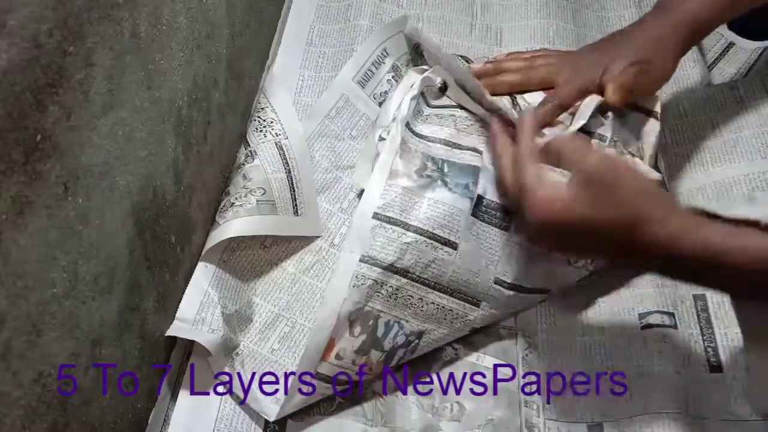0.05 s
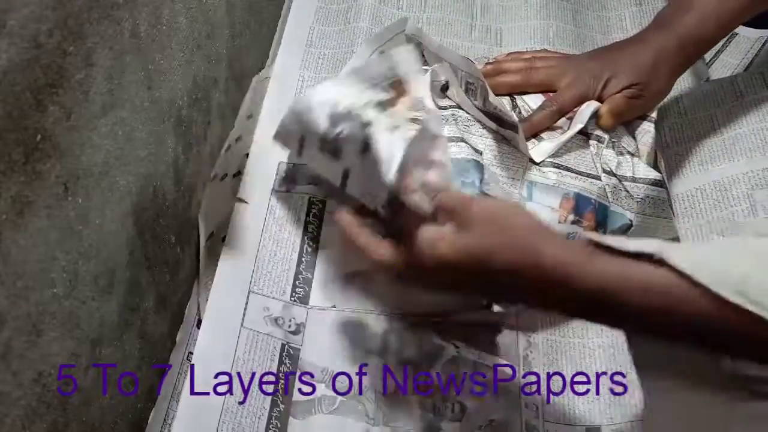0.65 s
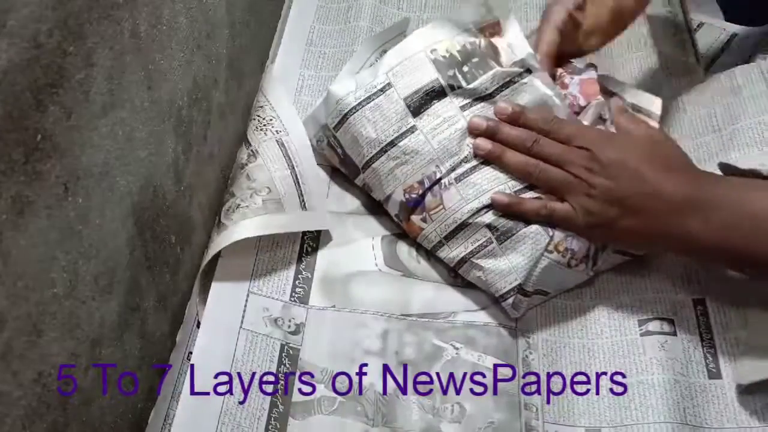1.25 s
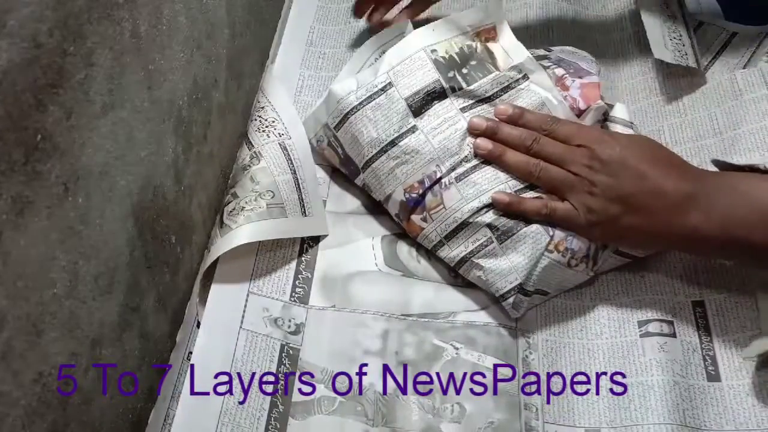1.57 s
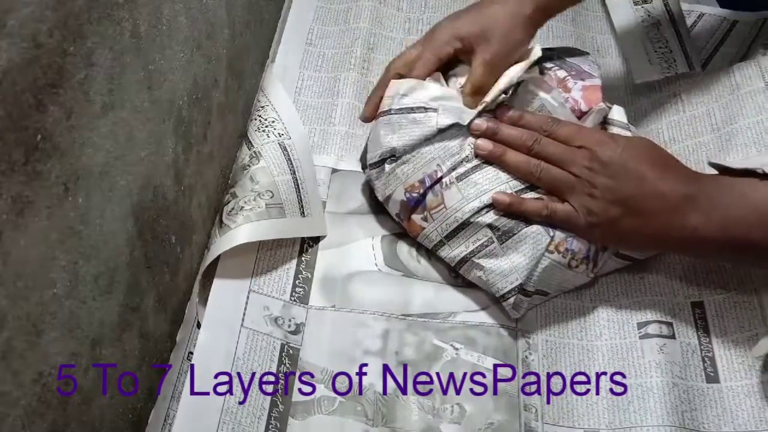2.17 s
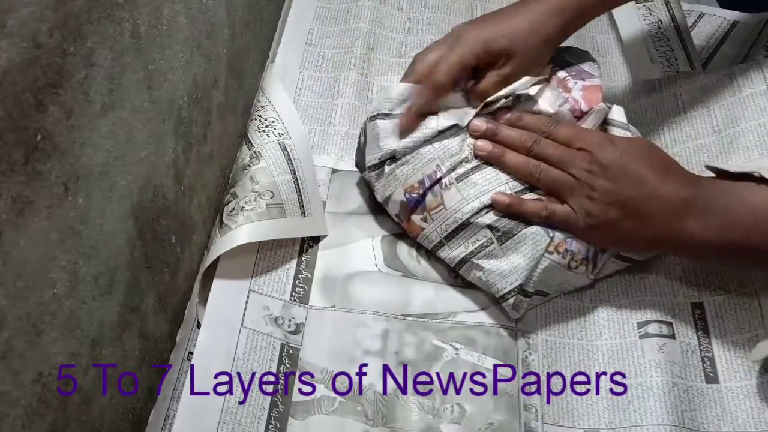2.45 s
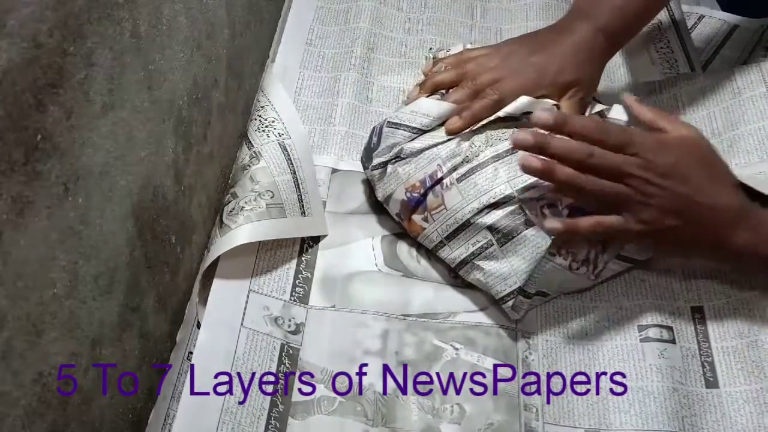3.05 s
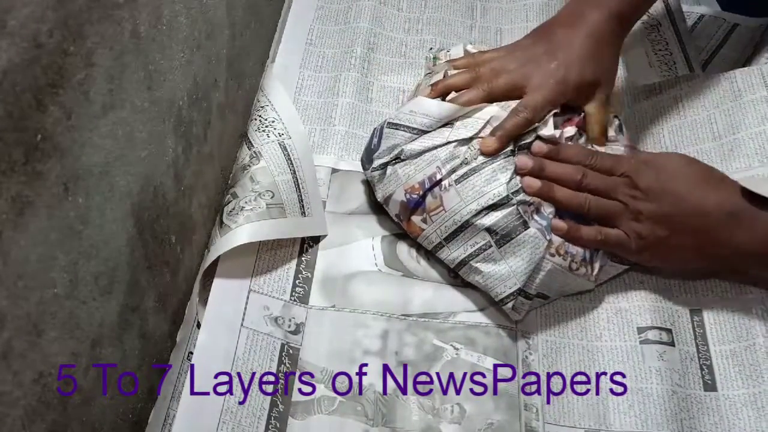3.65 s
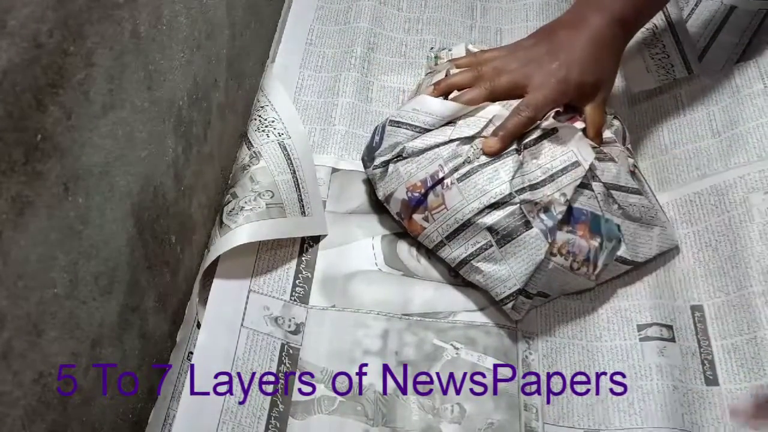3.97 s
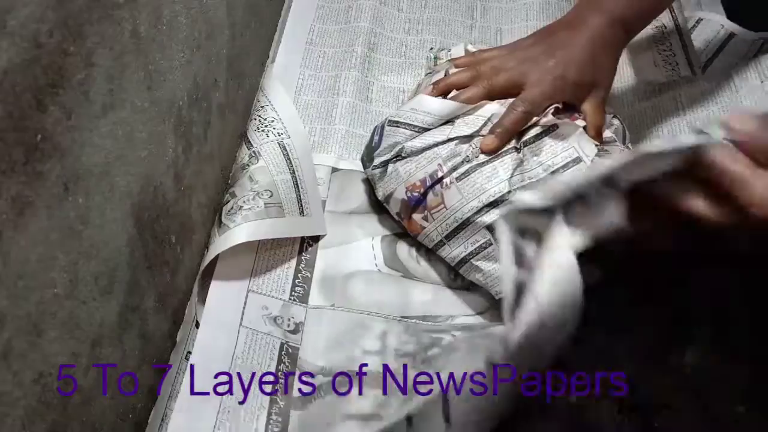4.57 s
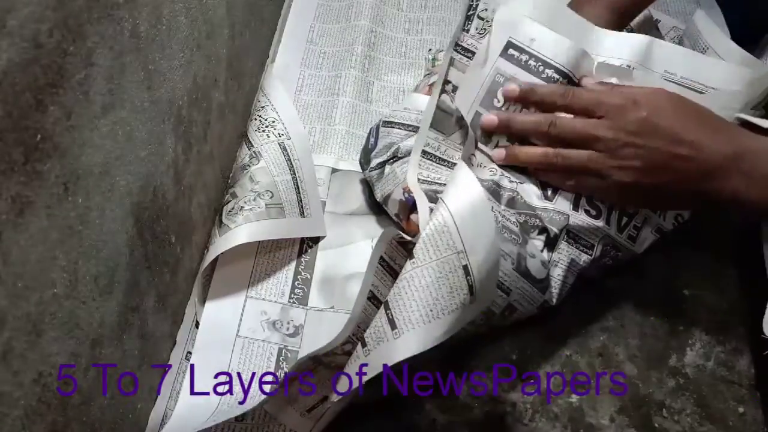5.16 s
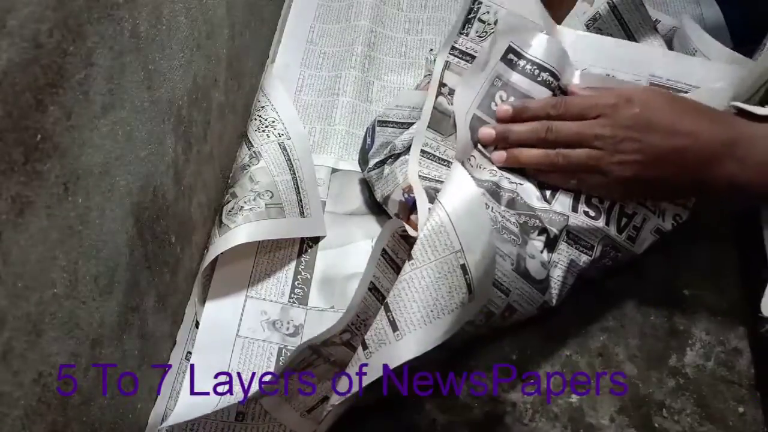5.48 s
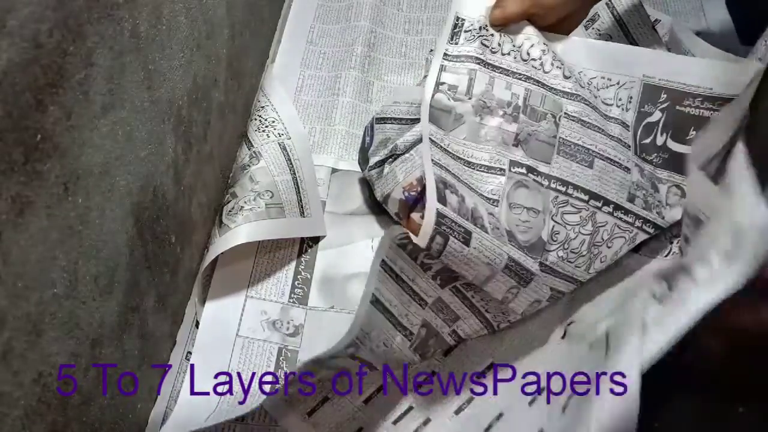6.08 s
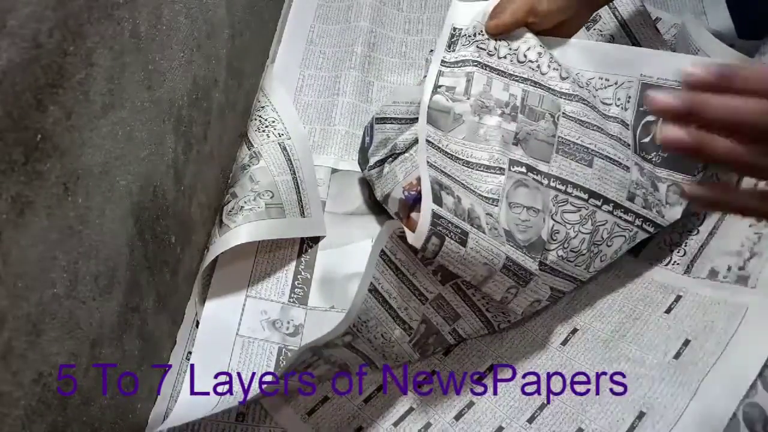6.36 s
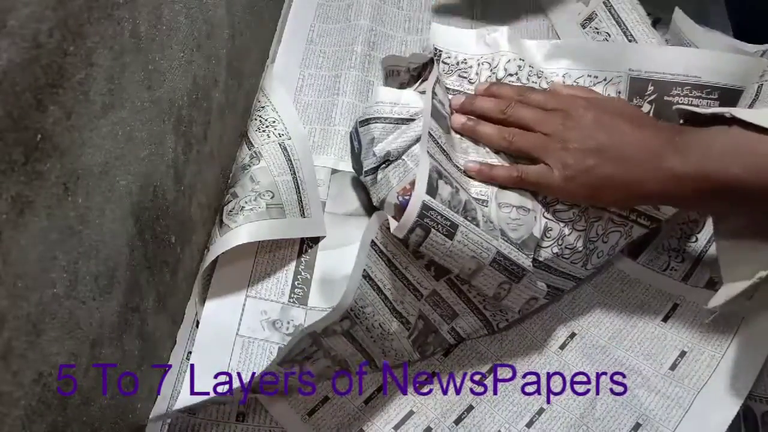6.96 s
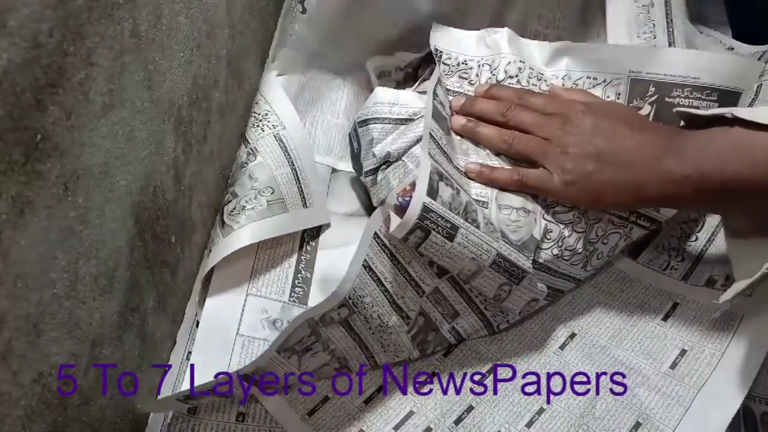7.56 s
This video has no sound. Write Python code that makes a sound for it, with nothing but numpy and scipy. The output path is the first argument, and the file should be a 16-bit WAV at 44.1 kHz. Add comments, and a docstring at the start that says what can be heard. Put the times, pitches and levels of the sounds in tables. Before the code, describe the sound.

Newspaper is folded and pressed by hand around a bundle, close to the microphones in a small room with a short ring. For the first 2.5 seconds, busy strokes of crinkling and sliding paper mix with sharp crease snaps and hollow pops, and the bundle thuds softly on the floor near 1, 1.7 and 2.2 seconds. Lighter rustling follows. From 4 to 4.7 seconds the crackle grows again over a run of dull bumps, then eases into softer tucks. After a brief lull, the sharpest snaps come at about 6.6 seconds with a burst of crinkling and a thud. The paper almost settles around 7 seconds, then rustles and slides strongly from 7.4 to 7.8, ending on a snap and a pop. Faint room noise lies underneath, and a very faint low hum swells at the start and around 3 seconds.

```python
"""Newspaper, folded and pressed by hand round a bundle on the floor of a small hard room.
A closely spaced microphone pair hears each stroke: swarms of tiny buckles crackle, the sheets flex
and push air, single creases snap through, slack panels pop and the bundle knocks on the floor.
The paper sounds near, with a short ring from the bare walls. Behind it lie faint room noise
and a low hum that swells briefly, twice."""
import sys
import numpy as np
from scipy import signal
from scipy.fft import rfft, irfft, next_fast_len
from scipy.io import wavfile
from scipy.ndimage import uniform_filter1d, map_coordinates

SR = 44100
rng = np.random.default_rng(int(sys.argv[2]) if len(sys.argv) > 2 else 0)


def waveform_to_disk(signal):
    """Save audio, clipped to [-1, 1], as 16-bit WAV at the path in sys.argv[1]."""
    frames = np.transpose(np.atleast_2d(signal))
    scaled = np.clip(frames, -1, 1) * 32767
    samples = np.round(scaled).astype(np.int16)
    wavfile.write(sys.argv[1], SR, samples)


N = 344862


# spectra of the crinkle, the flexing sheet and the air pressed from the bundle: f/Hz, level/dB
CRINKLE_SPECTRUM = [(820, -21.5), (1400, -13.5), (1710, -1.5), (1910, -2), (2410, 2), (3680, -4.5),
                    (4730, -8), (6460, -2), (6860, -7), (8140, -21), (9000, -27.5), (12100, -35.5),
                    (14700, -29), (15500, -35)]
FLEX_SPECTRUM = [(250, -32), (335, -16), (385, -3), (440, 1.5), (510, 5), (570, -2.5), (640, 2.5),
                 (720, -3.5), (860, -4), (1000, -8.5), (1090, 0), (1350, -6.5), (1600, -14), (2400, -49)]
PUFF_SPECTRUM = [(25, -48), (50, -62.5), (80, -33), (110, 4.5), (135, 0.5), (195, 3), (280, 4.5), (340, -3),
                 (500, -51)]
def sheets(puff_lag_s=0.011):
    """Crushed paper buckles coarsely, sliding paper finely; both crinkle, flex and puff out air."""
    (crinkle_gain, treble_gain, flex_gain, puff_gain), hollow_hz, sliding = hands()
    crushing = crackle(per_s=600, size_db=3, clump_db=6.5, slide_db=3.5, slide_ms=4.3, rub_db=-17)
    brushing = crackle(per_s=2500, size_db=2.5, clump_db=4.5, slide_db=4, slide_ms=4.2, rub_db=-16,
                       pitches=9)
    buckles = np.sqrt(1 - sliding) * crushing + np.sqrt(sliding) * brushing
    buckles = shifting_shape(buckles, depth_db=3.4, per_octave=7, per_s=32)
    crinkle = colour(buckles, CRINKLE_SPECTRUM)
    coarse = colour(crinkle, [(3200, -1.5), (4000, -21), (5000, -26)])
    fine = crinkle - coarse
    crisp = from_db(0.07) * crinkle_gain * rms_one(coarse)
    crisp += from_db(-0.92) * treble_gain * rms_one(fine)
    crisp += from_db(-7) * treble_gain * wrinkles(per_s=95, size_db=3.5, decay_ms=0.71)
    flex = hollow(colour(buckles, FLEX_SPECTRUM), hollow_hz, lift_db=3, octaves=0.44)
    flexing = from_db(-1) * flex_gain * rms_one(flex)
    # air leaves the bundle a moment after the hands press
    puff_gain = np.interp(np.arange(N) - puff_lag_s * SR, np.arange(N), puff_gain)
    puffs = from_db(-1.5) * puff_gain * rms_one(colour(buckles, PUFF_SPECTRUM))
    return crisp + flexing + puffs


# each push, tuck or pull of the hands: t/s, length/s, swell/dB, settling/dB, crinkle level/dB,
# treble over crinkle/dB, flex level/dB, puff level/dB, hollow f/Hz, sliding share/0-1
HAND_STROKES = [(-0.002, 0.073, -4, -10, -31, -2, -29.5, -42, 540, .3),
                (0.257, 0.04, -3, -5.5, -41, -4, -44, -51, 467, .2),
                (0.343, 0.052, 0, -9, -28.5, -8, -30.5, -53, 1110, 0.57),
                (0.415, 0.048, -2, -5.5, -29.5, -2.5, -27, -41, 510, 0.8),
                (0.474, 0.02, -3, -7, -35.5, 2, -31, -40, 560, 0.3),
                (0.508, 0.067, 3.5, -1.5, -31.5, -2, -30, -38.5, 600, 0.56),
                (0.659, 0.19, -3.5, -5, -35, -0.5, -32, -39, 570, 0.65),
                (0.849, 0.13, -10, -8, -35.5, 1, -32, -49, 565, 0.48),
                (0.991, 0.032, -1, -12, -29, 1, -26.5, -34, 750, 0.46),
                (1.076, 0.3, 4.5, 0, -39.5, 0, -38.5, -49, 634, 0.48),
                (1.624, 0.095, -2, -9, -45.5, 0.5, -63, -76, 696, 0.32),
                (1.702, 0.029, 6, -5.5, -32, -6, -32, -39.5, 495, 0.56),
                (1.765, 0.047, 7, -2.5, -35.5, -5, -31, -39, 466, .6),
                (1.853, 0.025, -0.5, -0.5, -39, -1, -33, -45, 450, 0.7),
                (1.924, 0.13, -2, 0, -35.5, -2.5, -32, -41.5, 573, 0.4),
                (2.036, 0.041, 3.5, -2.5, -30.5, -4.5, -33.5, -46, 1200, .5),
                (2.127, 0.058, 1, -4.5, -35.5, -4.5, -31, -47, 760, 0.34),
                (2.203, 0.017, 1, -6.5, -33.5, -2, -35, -42, 560, 0.55),
                (2.295, 0.026, 7.5, -6.5, -39, 1.5, -38, -49, 750, 0.77),
                (2.383, 0.076, 5, -4.5, -38.5, -1, -36.5, -55, 900, 0.84),
                (2.476, 0.38, 1, -4, -38.5, -.5, -40, -55, 670, 0.9),
                (2.941, 0.1, -8.5, -0.5, -43.5, -2, -43, -57, 600, .3),
                (3.132, 0.096, 19, 0, -44.5, -0.5, -41, -53.5, 600, .4),
                (3.333, 0.14, 12.5, 0, -45.5, 0, -41.5, -64, 700, 0.4),
                (3.535, 0.11, 10.5, 0.5, -43, -2.5, -42.5, -69, 1000, 0.53),
                (3.687, 0.1, 13.5, -30, -46.5, 1, -48, -64, 640, 0.6),
                (3.98, 0.036, -9, -11, -36.5, -6, -49, -59, 1100, .3),
                (4.102, 0.12, 3.5, -5.5, -34, -3.5, -41.5, -46.5, 890, 0.7),
                (4.323, 0.11, 19, -3.5, -40, -3.5, -46, -55, 905, 0.56),
                (4.482, 0.065, 18.5, -13, -39.5, -3, -41.5, -55, 850, 0.03),
                (4.569, 0.18, 6, -8.5, -33.5, 0.5, -33, -44.5, 485, 0.3),
                (4.79, 0.18, -4, 0, -47.5, -6, -44, -45, 487, 0.63),
                (5.012, 0.067, 2, -5, -45, -1, -41.5, -55, 900, 0.7),
                (5.122, 0.19, 8.5, -4.5, -42, -2, -40, -49.5, 500, 0.94),
                (5.356, 0.25, 1, -9, -51.5, -2, -50, -58, 696, 0.8),
                (5.626, 0.045, 5, -7, -45.5, 1, -41, -53, 800, .3),
                (5.716, 0.23, 1.5, 0, -41.5, 0, -39.5, -49, 490, 0.26),
                (6.002, 0.019, -6, 2, -39.5, -1.5, -36, -45, 443, 0.34),
                (6.072, 0.12, 2, -7.5, -41.5, 4, -38.5, -50, 480, 0.3),
                (6.227, 0.091, -21, 4, -51, -18, -59, -70, 490, 0.4),
                (6.524, 0.035, 15.5, -15, -34.5, -2.5, -34.5, -43.5, 760, 0.24),
                (6.566, 0.11, -0.5, -6, -37, 1, -31, -46, 500, 0.1),
                (6.713, 0.098, 0, 4, -44.5, -1.5, -39.5, -60, 750, 0.47),
                (7.137, 0.098, 16, -5, -50, -2.5, -57.5, -70, 700, 0.85),
                (7.245, 0.14, 11, -9, -41.5, -6.5, -39, -52, 835, 0.6),
                (7.41, 0.043, 7, -3.5, -30.5, -4, -32, -40, 745, 0.95),
                (7.516, 0.15, 0.5, -9, -37.5, -4, -37.5, -54, 940, 0.77),
                (7.678, 0.14, -6.5, -9, -34.5, -2.5, -33.5, -43.5, 630, 0.43)]
def hands():
    """Strokes add power to the paper's resting stir; the strongest sway hollow pitch and sliding most."""
    rest = from_db([[-62], [-64.5], [-61.5], [-69]])   # crinkle, treble, flex, puffs
    rest = rest * waver(depth_db=3, per_s=55)
    envelopes = np.array([stroke(*row[:4]) for row in HAND_STROKES]) ** 2
    crinkle_db, bright_db, flex_db, puff_db, hollow_hz, sliding = np.transpose(HAND_STROKES)[4:]
    powers = from_db([crinkle_db, crinkle_db + bright_db, flex_db, puff_db]) ** 2
    crinkle_power, _, flex_power, _ = powers
    gains = np.sqrt(powers @ envelopes + rest ** 2)
    weighted_hz = (flex_power * hollow_hz) @ envelopes + 1e-12 * hollow_hz.mean()
    centre_hz = weighted_hz / (flex_power @ envelopes + 1e-12)
    sliding_share = (crinkle_power * sliding) @ envelopes / gains[0] ** 2
    return gains * stalls(depth_db=-1.5, length_s=0.017), centre_hz, np.clip(sliding_share, 0, 1)


def stroke(start_s, length_s, swell_db, settle_db, attack_s=0.012, stop_db_s=416, settle_db_s=129):
    """Gain of one stroke: it takes hold, swells or eases and stops fast; the paper settles more slowly."""
    t = np.arange(N) / SR - start_s
    gain, live = np.zeros(N), (t > 0) & (t < length_s + 1)
    t = t[live]
    after = np.maximum(t - length_s, 0)
    held_db = swell_db * (np.minimum(t / length_s, 1) - .5)
    release_db = np.maximum(-stop_db_s * after, min(settle_db, 0) - settle_db_s * after)
    gain[live] = np.minimum(t / attack_s, 1) * from_db(held_db + release_db)
    return gain


def crackle(per_s, size_db, clump_db, slide_db, slide_ms, rub_db, pitches=18):
    """Buckles of uneven size come in clumps on facets of many pitches; each lets the sheets slip."""
    born = rng.random(N) < per_s * from_db(clump_db * drift(70)) / SR
    sizes = born * from_db(size_db * np.minimum(rng.exponential(1, N), 4)) * rng.choice([-1, 1], N)
    pitch_index, cracks = rng.integers(0, pitches, N), 0
    for k, hz in enumerate(np.geomspace(900, 7000, pitches)):
        flip = facet(hz, decay_ms=.9, ring_db=-6, tail_db=-24, tail_ms=4)
        cracks = cracks + signal.oaconvolve((sizes * (pitch_index == k))[None], flip, axes=1)[:, :N]
    slip = signal.lfilter([1], [1, -np.exp(-1000 / (slide_ms * SR))], sizes ** 2 + 1e-18)
    swish = from_db(slide_db) * np.sqrt(slip / slip.mean()) + from_db(rub_db)
    rustle = rms_one(cracks) + swish * rms_one(rng.standard_normal((2, N)))
    # the hands feed in energy steadily, however it is shared among the buckles
    power = uniform_filter1d(np.mean(rustle ** 2, axis=0), size=1100)
    return microphone_pair(rustle / np.sqrt(power + 1e-9))


def facet(hz, decay_ms, ring_db, tail_db, tail_ms, rise_ms=0, run_ms=0):
    """One patch of paper flips: a crack with a broad ring, then a shiver through the sheet."""
    ms = np.arange(SR // 12) * 1000 / SR
    noise = rng.standard_normal((2, len(ms)))
    crack = rms_one(noise + from_db(ring_db) * rms_one(resonance(noise, hz, hz / 4)))
    rise = np.minimum((ms + 1e-3) / (rise_ms + 1e-3), 1) ** 4
    after = np.maximum(ms - rise_ms - max(run_ms, 0), 0)
    return crack * rise * (np.exp(-after / decay_ms) + from_db(tail_db) * np.exp(-after / tail_ms))


def shifting_shape(x, depth_db, per_octave, per_s):
    """The sheet keeps changing shape, so its resonances come and go all over the spectrum."""
    hz, t, cells = signal.stft(x, SR, nperseg=512)
    where = np.meshgrid(per_octave * np.log2(1 + hz / 400), per_s * t, indexing="ij")
    gain_db = depth_db * map_coordinates(rng.standard_normal((64, 512)), where, order=1, mode="wrap")
    return signal.istft(cells * from_db(gain_db), SR)[1][:, :N]


def hollow(x, centre_hz, lift_db, octaves):
    """The air under the sheet lifts a broad band that moves with each fold, at unchanged power."""
    hz, t, cells = signal.stft(x, SR, nperseg=512)
    away = np.log2((hz[:, None] + 1) / np.interp(t * SR, np.arange(N), centre_hz)) / octaves
    gain = from_db(lift_db * np.exp(-away ** 2))
    power = np.mean(abs(cells) ** 2, axis=(0, 2))
    gain /= np.sqrt(power @ gain ** 2 / power.sum())
    return signal.istft(cells * gain, SR)[1][:, :N]


# spectrum of the smallest wrinkles, heard only in the treble: f/Hz, level/dB
WRINKLE_SPECTRUM = [(1500, -25), (3200, 9), (5000, -4), (6700, 9), (8300, -21), (12000, -27), (15500, -22)]
def wrinkles(per_s, size_db, decay_ms, pitches=8):
    """Tiny stiff wrinkles flip on their own, each with a dry tick."""
    born = rng.random(N) < per_s / SR
    sizes = born * from_db(size_db * np.minimum(rng.exponential(1, N), 2))
    pitch_index, ticks = rng.integers(0, pitches, N), np.zeros((2, N + SR))
    flips = [facet(hz, decay_ms, ring_db=-2, tail_db=-26, tail_ms=3)
             for hz in np.geomspace(3200, 7000, pitches)]
    for at in np.flatnonzero(born):
        add_at(ticks, at / SR, sizes[at] * flips[pitch_index[at]])
    return rms_one(microphone_pair(colour(ticks[:, :N], WRINKLE_SPECTRUM)))


# spectra of a snap's body and of its sharp edge: f/Hz, level/dB
SNAP_SPECTRUM = [(150, -35), (500, -12), (1400, -5.5), (2500, -1.5), (4300, -5.5), (6600, -6), (7400, -17),
                 (8400, -32), (12000, -67.5), (15500, -42)]
EDGE_SPECTRUM = [(2000, -11), (4000, 1.5), (6800, 16.5), (8500, -6), (12000, -11), (15500, -8)]
# creases that snap through: t/s, relative body level/dB, f/Hz, relative edge level/dB
CREASE_SNAPS = [(0.069, -14, 2470, -44), (0.112, -19, 2550, -54.5), (0.155, -28, 1780, -75),
                (0.163, -33, 3790, -74), (0.177, -31, 6380, -68), (0.228, -24.5, 2290, -70),
                (0.268, -16, 2430, -75), (0.351, -17, 1700, -58), (0.388, -14, 2310, -60),
                (0.423, -10.5, 1540, -59), (0.485, -12, 6000, -45), (0.617, -16.5, 2740, -63),
                (0.68, -18, 3300, -53), (0.695, -11.5, 2700, -48), (0.7293, -8.5, 3700, -44.5),
                (0.773, -8, 1770, -40.5), (0.884, -12, 1700, -44), (0.954, -13.5, 6300, -58),
                (1.004, -12.5, 3880, -43), (1.017, -11, 1280, -50), (1.1655, -13, 2820, -42.5),
                (1.335, -22, 2900, -58), (1.459, -17, 2370, -64), (1.551, -26, 2830, -59),
                (1.636, -25, 2468, -75), (1.712, -17, 2410, -46), (1.803, -15, 2440, -62),
                (1.936, -13.5, 1760, -51), (2.017, -20, 5970, -50), (2.056, -12.5, 1830, -54),
                (2.1987, -11.5, 6420, -42.5), (2.213, -15, 2780, -62), (2.505, -15.5, 2490, -47),
                (2.632, -14.5, 3860, -52), (2.667, -20.5, 5150, -51), (2.84, -16, 6900, -62),
                (2.904, -35, 2420, -79), (3.002, -18.5, 2480, -58), (3.052, -23, 2420, -60),
                (2.938, -22, 2250, -67), (3.123, -30, 3100, -80), (3.165, -17.5, 2200, -63),
                (3.195, -14, 1080, -49), (3.214, -13, 2450, -50), (3.248, -16, 937, -49),
                (3.279, -16.5, 2760, -54), (3.517, -16.5, 2430, -70), (3.5275, -13, 5200, -44),
                (3.603, -10.5, 2440, -51), (3.617, -17.5, 2350, -50), (3.852, -21, 2580, -83),
                (3.886, -39, 5960, -85), (3.9509, -26, 2110, -66), (3.9839, -16.5, 1700, -64),
                (4.065, -35, 6600, -81), (4.106, -24, 4280, -52), (4.132, -11.5, 2650, -63),
                (4.2102, -6.5, 6000, -41), (4.335, -18.5, 2230, -75), (4.354, -29.5, 2130, -75),
                (4.391, -16, 2730, -55), (4.429, -13.5, 2270, -51), (4.533, -12.5, 6040, -43),
                (4.649, -14, 2300, -41.5), (4.749, -13.5, 2750, -43), (4.814, -17.5, 2550, -55),
                (4.864, -15.5, 1720, -58), (4.953, -28, 2410, -81), (4.997, -29, 3100, -76),
                (5.018, -24, 2380, -79), (5.041, -22.5, 3640, -68), (5.059, -17.5, 1390, -58),
                (5.068, -20, 2380, -54), (5.124, -26, 1370, -70), (5.158, -17, 1070, -53),
                (5.243, -17.5, 2480, -65), (5.2817, -16.5, 2560, -47.5), (5.304, -14, 2950, -64),
                (5.367, -24.5, 1030, -64), (5.5015, -22.5, 2120, -54), (5.513, -23, 6260, -60),
                (5.548, -20, 1160, -59), (5.6312, -15.5, 6160, -52), (5.661, -16, 3200, -47),
                (5.748, -14.5, 1780, -45), (5.864, -14, 2500, -54), (5.922, -14, 1070, -74),
                (5.971, -28, 3445, -66), (6.008, -14, 3040, -48.5), (6.126, -17, 2400, -59),
                (6.198, -18, 2660, -67), (6.424, -22, 2660, -90), (6.438, -31, 1380, -85),
                (6.49, -33, 2050, -85), (6.5389, -14, 2410, -68), (6.555, -4, 6540, -39),
                (6.557, -4.5, 2550, -43), (6.603, -14, 2880, -47), (6.627, -15, 3850, -47),
                (6.641, -11.5, 2400, -46), (6.659, -11.5, 2420, -53), (6.672, -19, 3700, -59),
                (6.731, -21, 2480, -71), (6.744, -18, 3750, -52), (6.807, -15, 3970, -53),
                (6.849, -23, 1940, -53.5), (6.869, -18, 2440, -63), (6.947, -31, 1700, -76.5),
                (6.961, -23, 2790, -83), (6.987, -36, 2200, -81), (7.009, -19.5, 2470, -61),
                (7.075, -30.5, 2850, -90), (7.197, -25, 1900, -85), (7.255, -19.5, 2080, -75),
                (7.394, -14.5, 1340, -73), (7.495, -10.5, 5800, -49), (7.561, -17, 1770, -49),
                (7.593, -14, 2430, -75), (7.693, -16, 2500, -56), (7.788, -10.5, 2330, -40.5)]
def creases(body_gain_db=-5, edge_gain_db=11.5, note_db=-5):
    """Large folds snap, just left of centre, each at its own pitch; the stiffest with a bright edge."""
    snaps, edges = np.zeros((2, 2, N + SR))
    mean_db = np.mean(np.transpose(CREASE_SNAPS)[1])
    for s, body_db, hz, edge_db in CREASE_SNAPS:
        purity_db = np.interp(hz, [2400, 3700], [-13, -3])   # small stiff creases ring more purely
        run_ms = 0.62 + 0.12 * (body_db - mean_db)   # louder ones run longer along the fold
        decay_ms = 3 * np.sqrt(2300 / hz)   # higher ones die sooner
        snap = facet(hz, decay_ms, purity_db, tail_db=-12.5, tail_ms=15.6, rise_ms=1.5, run_ms=run_ms)
        snap += from_db(note_db) * swing(hz, rise_ms=0.96, decay_ms=1.63)
        snap = low_cut(snap, 0.23 * hz)   # a crease is too small to radiate far below its pitch
        edge = facet(hz, decay_ms=1.6, ring_db=-38, tail_db=-7.5, tail_ms=12, rise_ms=0.99, run_ms=0.59)
        add_at(snaps, s, snap * from_db(body_db + body_gain_db))
        add_at(edges, s, edge * from_db(edge_db + edge_gain_db))
    snapping = colour(snaps[:, :N], SNAP_SPECTRUM) + colour(edges[:, :N], EDGE_SPECTRUM)
    return microphone_pair(snapping) * from_db([[.6], [-.6]])


def stalls(depth_db, length_s):
    """Gain of the rustle: it dips while a crease resists and comes back with the snap."""
    dip_db, n = np.zeros(N), round(length_s * SR)
    for s, *_ in CREASE_SNAPS:
        at = round(s * SR)
        dip_db[at - n:at] = depth_db * signal.windows.tukey(n, .5)
    return from_db(dip_db)


# slack panels popping with a hollow note: t/s, level/dB, f/Hz
PANEL_POPS = [(0.063, -17, 594), (0.825, -17, 550), (0.852, -14.5, 573), (0.935, -20, 554),
              (1.12, -21.5, 633), (1.372, -26, 506), (1.449, -29, 646), (1.87, -21, 1120),
              (2.372, -26.5, 640), (2.466, -26, 472), (2.995, -29, 1160), (3.053, -31.5, 1100),
              (3.216, -26, 590), (3.587, -24, 1065), (3.656, -30, 580), (4.919, -32, 484),
              (5.124, -33, 1160), (5.379, -36, 673), (5.749, -23.5, 563), (5.865, -21, 554),
              (7.798, -18, 667)]
def pops(rise_ms, decay_ms):
    """Slack panels flip from one bulge to the other; they radiate little below their note."""
    out = np.zeros((2, N + SR))
    for s, level_db, hz in PANEL_POPS:
        add_at(out, s, from_db(level_db) * low_cut(swing(hz, rise_ms, decay_ms), hz / 2))
    return out[:, :N]


def swing(hz, rise_ms, decay_ms):
    """A patch of paper swings a few times; it reaches the two microphones a little out of step."""
    ms = np.arange(SR // 12) * 1000 / SR
    phase = 2 * np.pi * (hz * ms / 1000 + rng.random())
    mic_offset = min(hz / 4000, .7) * rng.choice([-1, 1]) * np.array([[1], [-1]])
    envelope = np.minimum(ms / rise_ms, 1) ** 4 * np.exp(-np.maximum(ms - rise_ms, 0) / decay_ms)
    return np.sin(phase + mic_offset) * envelope


# folds pushed flat over a hollow: t/s, length/s, first f/Hz, last f/Hz, level/dB
CLOSING_FOLDS = [(.01, 0.098, 580, 530, -37.5), (0.662, 0.24, 560, 545, -33),
                 (1.005, 0.026, 1220, 1110, -38), (1.71, 0.027, 510, 447, -29),
                 (1.856, 0.035, 427, 400, -35), (2.056, 0.033, 1800, 1670, -35),
                 (2.132, 0.053, 810, 574, -32), (3.189, 0.062, 610, 537, -33.5),
                 (3.751, 0.083, 610, 625, -50.5), (4.577, .05, 470, 417, -37.5),
                 (6.569, 0.027, 620, 664, -30), (6.587, 0.041, 302, 200, -29.5),
                 (7.264, 0.11, 810, 686, -38.5), (7.437, .04, 1310, 1150, -42),
                 (7.781, 0.036, 650, 610, -31)]
def folds(width_hz):
    """Rubbing paper excites the air under a fold, whose pitch glides as the fold closes."""
    out, r = np.zeros((2, N + SR)), np.exp(-np.pi * width_hz / SR)
    for s, length_s, first_hz, last_hz, level_db in CLOSING_FOLDS:
        n = round(length_s * SR)
        glide = np.exp(2j * np.pi * np.cumsum(np.geomspace(first_hz, last_hz, n)) / SR)
        ring = glide * signal.lfilter([1], [1, -2 * r, r * r], rng.standard_normal((2, n)) / glide)
        add_at(out, s, from_db(level_db) * rms_one(ring.real) * signal.windows.tukey(n, .5))
    return microphone_pair(out[:, :N])


# the bundle knocking on the floor: t/s, level/dB, f/Hz
FLOOR_KNOCKS = [(1.004, -29, 212), (1.715, -30, 124), (2.218, -30, 254), (3.203, -35, 196),
                (3.441, -42, 111), (3.694, -42.5, 222), (4.055, -42, 106), (4.113, -38, 116),
                (4.153, -28, 106.4), (4.248, -33, 115), (4.409, -34.5, 125), (4.523, -31.5, 103),
                (4.665, -33, 117), (5.228, -35, 193), (6.588, -22, 155), (6.603, -24, 224),
                (7.585, -40, 135), (7.669, -31, 130), (7.74, -44, 134)]
def knocks(rise_s, decay_s, sag_share, sag_s):
    """The soft bundle meets the floor with a damped thud whose pitch sags as the blow eases."""
    out, t = np.zeros(N + SR), np.arange(SR // 2) / SR
    cycles_per_hz = np.cumsum(1 + sag_share * (np.exp(-t / sag_s) - .5)) / SR
    envelope = (1 - np.exp(-t / rise_s)) * np.exp(-t / decay_s)
    for s, level_db, hz in FLOOR_KNOCKS:
        add_at(out, s, from_db(level_db) * envelope * np.sin(2 * np.pi * hz * cycles_per_hz))
    return out[:N]


# narrow resonances of the small room: f/Hz, width/Hz, level/dB
ROOM_RESONANCES = [(522, 11, -21), (631.4, 14, -5.5), (937, 17, 1.5), (1092, 18, -16)]
def room_ring(x):
    """A few modes of the room ring on after the paper."""
    return sum(from_db(db) * resonance(x, hz, width_hz) for hz, width_hz, db in ROOM_RESONANCES)


# reverberation time of the room: f/Hz, t60/s
WALL_DECAY = [(150, 0.55), (530, 0.15), (1400, 0.2), (3700, 0.087), (10000, 0.019)]
def walls(x, wet_db):
    """Bare walls return a dense tail, 5 ms behind the direct sound, that dies sooner in the treble."""
    t = np.arange(SR // 2) / SR
    edges, tail = np.geomspace(50, 16000, 10), 0
    for low, high in zip(edges, edges[1:]):
        bandpass = signal.butter(2, [low, high], "band", fs=SR, output="sos")
        band = signal.sosfilt(bandpass, rng.standard_normal((2, len(t))))
        tail = tail + band * np.exp(-np.log(1000) * t / at_hz(WALL_DECAY, np.sqrt(low * high)))
    tail *= t > .005
    tail /= np.sqrt(np.sum(tail ** 2) / 2)
    return from_db(wet_db) * microphone_pair(signal.fftconvolve(x, tail, axes=1)[:, :N])


# swells of a faint hum in the background: t/s, length/s, first f/Hz, last f/Hz, level/dB
HUM_SWELLS = [(0.0, 0.53, 142, 133, -57), (2.68, 0.55, 142.4, 133.3, -53)]
def hum():
    """A low tone swells, wavers and sags in pitch."""
    out = np.zeros(N)
    for s, length_s, first_hz, last_hz, level_db in HUM_SWELLS:
        n = round(length_s * SR)
        tone = np.sqrt(2) * np.sin(2 * np.pi * np.cumsum(np.linspace(first_hz, last_hz, n)) / SR)
        add_at(out, s, from_db(level_db) * tone * signal.windows.tukey(n, .5))
    return out * waver(depth_db=5, per_s=28)


# spectrum of the quiet room: f/Hz, level/dB
ROOM_TONE_SPECTRUM = [(25, -10), (70, 7), (115, 16), (155, 15.5), (210, -36), (600, -20), (1500, -5.5),
                      (2500, -42), (6500, -27), (8500, -49), (15500, -40)]
def room_tone(level_db):
    """Faint steady noise, mostly bass, at both microphones."""
    noise = colour(rng.standard_normal((2, N)), ROOM_TONE_SPECTRUM)
    return from_db(level_db) * rms_one(microphone_pair(noise))


# stereo width at the microphones: f/Hz, side-to-mid level/dB
PAIR_WIDTH = [(60, -8), (170, -25), (350, -8), (700, -6), (1400, -0.5), (2800, -2), (5600, 0),
              (12000, -0.5)]
def microphone_pair(x):
    """Two closely spaced microphones hear the bass alike and the treble differently."""
    mid, side = x[0] + x[1], colour(x[0] - x[1], PAIR_WIDTH)
    return np.array([mid + side, mid - side]) / 2


def from_db(db):
    """Decibels to gain."""
    return 10 ** (np.asarray(db) / 20)


def rms_one(x):
    """Scale a stereo sound so that its mid has rms 1."""
    return x / np.sqrt(np.mean(x.mean(axis=0) ** 2) + 1e-20)


def add_at(track, start_s, sound):
    """Mix a sound into a track from start_s on."""
    at = round(start_s * SR)
    track[..., at:at + sound.shape[-1]] += sound


def at_hz(points, hz):
    """Read a curve on a log-frequency axis."""
    f, value = np.transpose(points)
    return np.interp(np.log(np.maximum(hz, 1)), np.log(f), value)


def colour(x, points):
    """Filter by a smooth spectrum in dB."""
    size = next_fast_len(x.shape[-1] + SR // 20)
    gain = from_db(at_hz(points, np.fft.rfftfreq(size, 1 / SR)))
    return irfft(rfft(x, size) * gain, size)[..., :x.shape[-1]]


def low_cut(x, hz):
    """Two-pole high-pass."""
    return signal.sosfilt(signal.butter(2, hz, "high", fs=SR, output="sos"), x)


def resonance(x, hz, width_hz):
    """Two-pole resonance with gain 1 at its peak."""
    r = np.exp(-np.pi * width_hz / SR)
    feedback = [1, -2 * r * np.cos(2 * np.pi * hz / SR), r * r]
    return signal.lfilter(np.array([1, 0, -1]) * (1 - r * r) / 2, feedback, x)


def drift(per_s):
    """A random curve through per_s new values a second."""
    knots = rng.standard_normal(N // 10)
    return np.interp(np.arange(N) * per_s / SR, np.arange(len(knots)), knots)


def waver(depth_db, per_s):
    """A wavering gain of mean power 1."""
    gain = from_db(depth_db * drift(per_s))
    return gain / np.sqrt(np.mean(gain ** 2))


# balance at the microphones: f/Hz, left-to-right level/dB
PAIR_BALANCE = [(100, -0.5), (350, -4.5), (700, -2), (1400, 1), (2800, -1.1), (6000, 1.3)]
def scene():
    """The paper in its room as the pair hears it, the lower tones a little to the right."""
    paper = sheets() + creases() + pops(rise_ms=1, decay_ms=3.7) + folds(width_hz=160)
    paper += knocks(rise_s=0.0038, decay_s=0.018, sag_share=0.42, sag_s=.02)
    left, right = paper + room_ring(paper) + walls(paper, wet_db=-16.5) + hum() + room_tone(-66.5)
    return np.array([colour(left, [(hz, db / 2) for hz, db in PAIR_BALANCE]),
                     colour(right, [(hz, -db / 2) for hz, db in PAIR_BALANCE])])


def record(dry):
    """Peaks are rounded, the microphones thin out the deepest bass and the top is cut steeply."""
    rounded = 0.78 * np.tanh(dry / 0.87)
    top_cut = signal.ellip(10, .2, 80, 15700, fs=SR, output="sos")
    return signal.sosfilt(top_cut, low_cut(rounded, hz=48))


dry = scene()
out = record(dry)
waveform_to_disk(out)
```